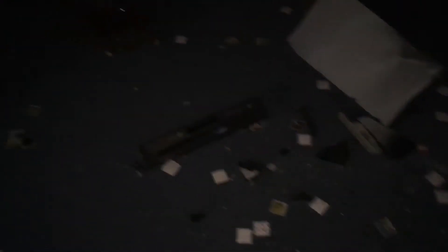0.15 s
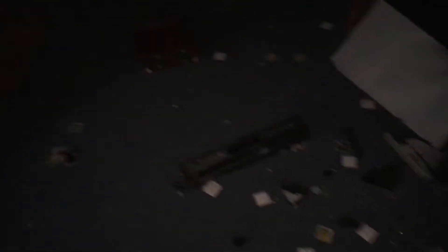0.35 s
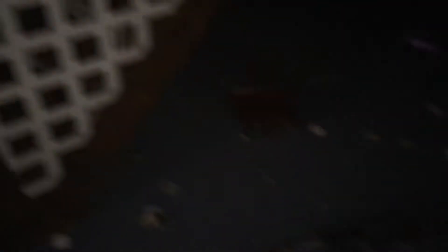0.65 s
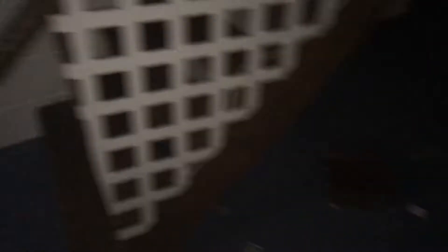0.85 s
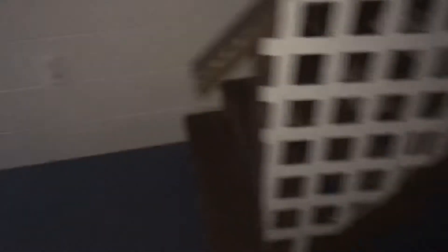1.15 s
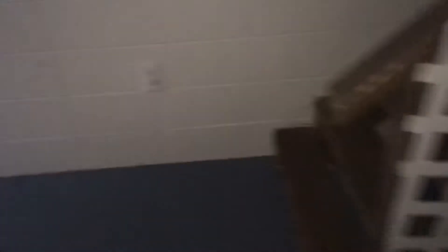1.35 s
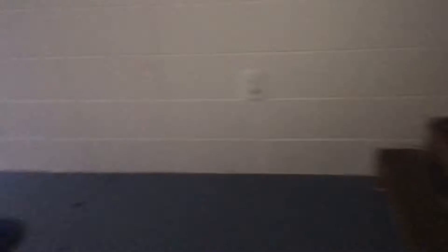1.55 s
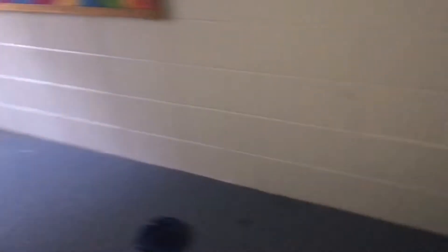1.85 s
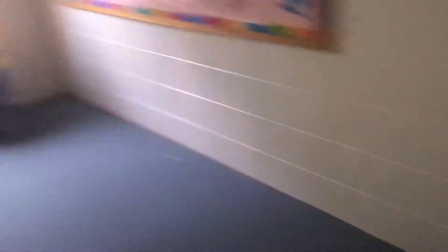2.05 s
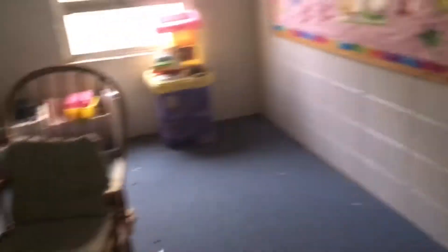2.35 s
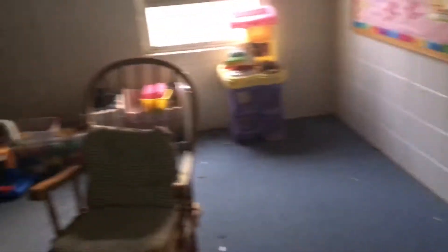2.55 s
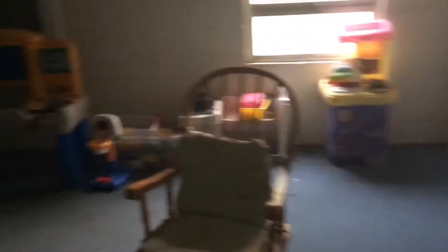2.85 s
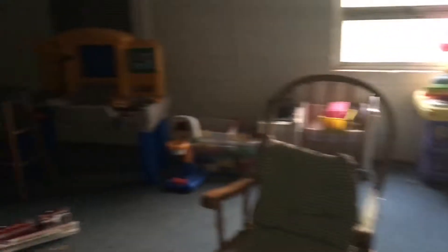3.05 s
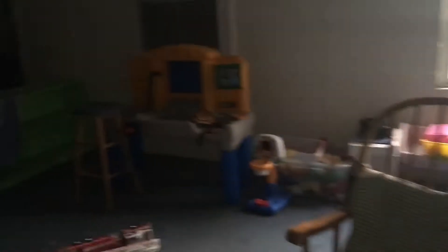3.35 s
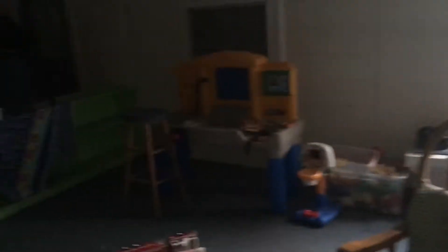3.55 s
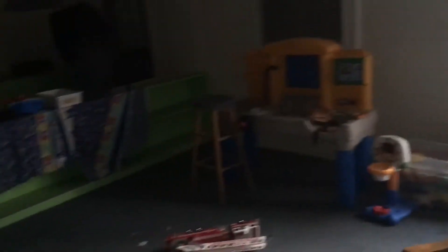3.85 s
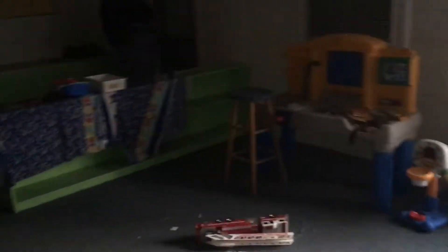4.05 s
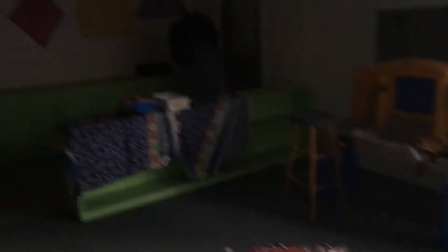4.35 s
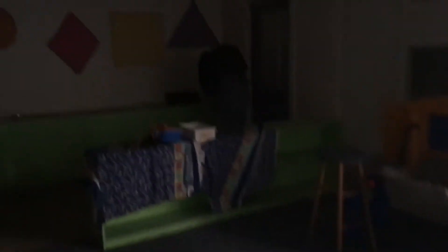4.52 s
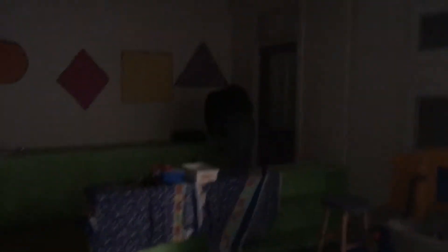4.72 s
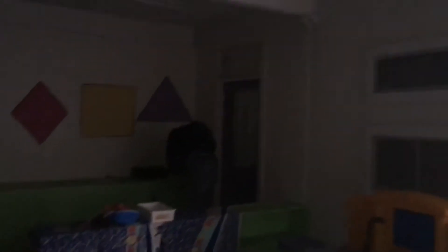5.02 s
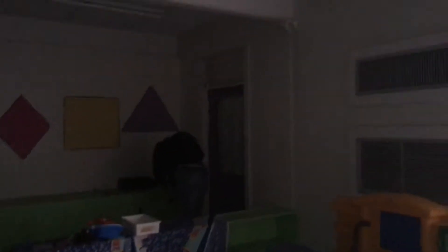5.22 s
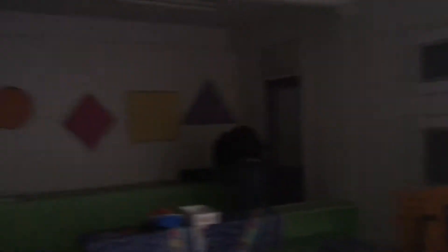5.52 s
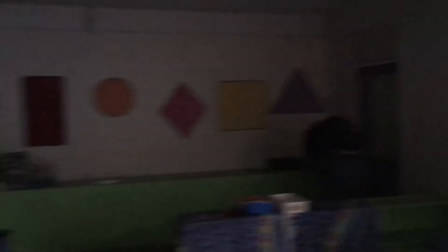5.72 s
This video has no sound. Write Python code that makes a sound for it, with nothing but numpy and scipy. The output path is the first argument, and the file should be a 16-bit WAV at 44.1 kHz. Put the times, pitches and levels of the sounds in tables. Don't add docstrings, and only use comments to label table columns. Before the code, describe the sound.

In a quiet, hard-walled playroom, a handheld camera picks up two quick wooden knocks with a bright buckle tick, then faint scuffs and soft steps on carpet. Midway a hollow plastic toy is kicked and clacks down. After more quiet shuffling, a door scrapes and slams with a rattling latch and deep boom. Low rumble, cloth rustle and hiss lie underneath.

```python
import sys
import numpy as np
from scipy import signal
from scipy.io import wavfile
from scipy.ndimage import uniform_filter1d

SR = 44100
rng = np.random.default_rng(int(sys.argv[2]) if len(sys.argv) > 2 else 0)


def how_loud(loudness_db):
    steps = np.asarray(loudness_db, float) / 20
    return 10 ** steps


def generate_wav(signal):
    frames = np.transpose(np.atleast_2d(signal))
    scaled = np.clip(frames, -1, 1) * 32767
    pcm = np.round(scaled).astype(np.int16)
    wavfile.write(sys.argv[1], SR, pcm)


N = 259308

# spread in octaves, level in the room in dB, quickness of rise.
WOOD = (0.85, -1.8, 5.7)
SNAP, PLASTIC = (0.59, -3, 8.7), (0.69, -4.5, 3.6)
LATCH, SWEEP, JAMB = (0.7, -20, 6.8), (1.97, -5, 1.53), (0.69, -2.5, 6.0)
THUD, SCUFF, SHUFFLE, CLICK = (0.84, -2, 8.7), (2.27, -5, 0.8), (1.22, -6.5, 1.5), (0.51, -4, 6.0)
TICK, PING, FIZZ = (1.5, -13, 3.2), (0.059, -3, 6.0), (0.39, -24, 6.0)
CLICK_MS, PING_MS = 0.95, 8.5

# start in seconds, peak level in dB, centre in Hz, length in ms.
WOOD_KNOCKS = [(.133, -64, 1900, 3.4), (.238, -51.5, 1470, 9), (.252, -42, 1020, 12.3),
               (.27, -42, 894, 7.7), (.281, -53, 980, 5.5), (.302, -51, 791, 7.1), (.436, -58.5, 1200, 3.4),
               (.581, -53, 1120, 11), (.589, -51.5, 865, 3.7), (.602, -41.5, 890, 4.6),
               (.609, -42, 1190, 4.5), (.632, -57, 1020, 3.8), (.684, -59, 1300, 5.5)]
# frequency in Hz, level in dB, t60 in seconds.
BOARD_MODES = [(655, -0.5, 0.51), (780, -3, 0.72), (894, 13.5, 0.12), (1038, 6, 0.29), (1264, -7, 0.61),
               (1370, 0, 0.061)]
# start in seconds, peak level in dB.
BOARD_BLOWS = [
    (0.252, -34),
    (0.27, -25.5),
    (0.303, -39),
    (0.434, -47),
    (0.59, -34),
    (0.61, -29.5),
]
# start in seconds, peak level in dB, centre in Hz, length in ms.
PLASTIC_SNAPS = [(0.245, -53.5, 3920, 3), (.608, -53, 4340, 4.5), (3.243, -63, 5500, 1.2),
                 (3.414, -62, 4600, 1.5), (2.9547, -54, 8400, .8), (2.9755, -54, 10800, .8),
                 (2.978, -50, 10800, 15), (2.9828, -42, 9500, 2), (3.468, -57.5, 4600, 2.3),
                 (3.631, -57, 6940, 6)]
# start in seconds, peak level in dB, centre in Hz, length in ms.
TOY_KNOCKS = [(2.978, -38.5, 3070, 5.2), (2.986, -44.5, 1060, 13), (2.998, -48.5, 3000, 7.1),
              (3.014, -43.5, 3100, 4.2), (3.018, -47.5, 1070, 6.9), (3.632, -58, 700, 8.8),
              (3.635, -54, 2130, 17), (3.669, -56, 1790, 2.4)]
# frequency in Hz, level in dB, t60 in seconds.
TOY_MODES = [(1018, 2, 0.18), (1427, -11, 5.0), (1762, -24, 0.77), (2880, -5, 0.18), (3000, -23, 0.32),
             (3230, -12, 0.14), (3450, -34, 0.27)]
# start in seconds, peak level in dB.
TOY_BLOWS = [
    (2.9777, -31),
    (3.0188, -32),
]
# start in seconds, peak level in dB, centre in Hz, length in ms.
LATCH_RATTLES = [
    (5.3262, -56, 12000, 3),
    (5.3414, -36, 12000, 2.1),
    (5.3556, -40, 14000, 2.5),
    (5.3576, -36, 6200, 2.2),
    (5.3813, -35, 7500, .8),
    (5.383, -30.5, 11500, 1.4),
]
# start in seconds, peak level in dB, centre in Hz, length in ms.
DOOR_SWEEPS = [
    (5.323, -41, 8900, 26),
    (5.3543, -33.5, 2450, 13),
    (5.378, -33.5, 2320, 17.5),
    (5.429, -54, 6500, 11),
]
# start in seconds, peak level in dB, centre in Hz, length in ms.
JAMB_CHATTER = [(5.341, -45, 3660, 16), (5.354, -39.5, 2930, 4), (5.362, -43.5, 850, 23),
                (5.383, -42, 3100, 3.1), (5.403, -38, 2490, 6.1), (5.424, -41, 2200, 6.1),
                (5.438, -43, 2070, 4.2)]
# start in seconds, peak level in dB, frequency in Hz, t60 in seconds.
DOOR_THUMPS = [(5.344, -28, 99.4, 0.25), (5.35, -29.5, 270, 0.35), (5.361, -34, 211.5, .31),
               (5.385, -30.5, 128.5, 0.32), (5.39, -21, 48.1, 0.29), (5.35, -37, 80, .4),
               (5.409, -43, 144, 0.26), (5.43, -47, 425, 0.27), (5.474, -27, 49.6, 0.19),
               (5.47, -43, 165, 0.42), (5.551, -43.5, 75.7, 0.5), (5.72, -53, 49.7, 0.71)]
# start in seconds, peak level in dB, centre in Hz, length in ms.
DULL_BLOWS = [(.255, -46.5, 253, 14), (.30, -49, 160, 33), (.60, -48, 261, 11), (0.627, -55.5, 200, 25),
              (2.9239, -51.5, 345, 2.75), (2.945, -53, 242, 12), (2.98, -50, 313, 18),
              (5.343, -42.5, 280, 5.8), (5.356, -50.5, 480, 38), (5.36, -36.5, 198, 8.6),
              (5.38, -36, 220, 15), (5.401, -37.5, 171, 36), (5.45, -42.5, 154, 24)]
# start in seconds, peak level in dB, frequency in Hz, t60 in seconds.
FLOOR_THUMPS = [(.252, -48, 225, 0.47), (.26, -45.5, 102.4, 0.47), (.338, -39.5, 52.6, .3),
                (.345, -46, 75, 0.22), (.408, -43, 56.3, 0.23), (.59, -46, 226.6, 0.26),
                (.63, -44, 237.6, .23), (1.70, -48.5, 183.6, 0.16), (1.72, -51, 93, 0.31),
                (2.07, -54, 53.7, .27), (2.42, -54, 55, 0.47), (2.725, -46.5, 166.4, .16),
                (2.924, -43, 376, 0.049), (2.94, -49, 169.6, 0.31), (2.98, -47.5, 238, 0.064),
                (3.37, -51, 150, .33), (3.43, -42, 76, 0.14), (3.46, -48.5, 54.7, 0.51),
                (3.55, -51, 52.7, 0.29), (5.1, -55, 72, .3), (5.15, -58, 71.5, 0.28)]
# start in seconds, peak level in dB, centre in Hz, length in ms.
SCUFFS = [(.228, -57.5, 2140, 16), (.405, -61.5, 1597, 17.3), (.79, -58, 6860, 18), (1.095, -63, 2180, 26),
          (1.53, -59.5, 2500, 12), (2.176, -59, 2960, 35), (2.32, -64, 2400, 13), (2.961, -53, 4480, 9.6),
          (3.36, -65, 2500, 29), (3.628, -50, 2370, 10.4), (4.165, -62.5, 2500, 23),
          (4.4496, -58, 3480, 12), (5.08, -68, 1810, 21)]
# start in seconds, peak level in dB, centre in Hz, length in ms.
CARPET_DRAGS = [(.50, -66.5, 3040, 19), (1.28, -69, 1700, 17), (2.03, -66.5, 1390, 25),
                (2.723, -68.5, 1720, 37), (2.977, -49, 2920, 32), (4.079, -70.5, 1470, 60),
                (4.70, -70, 1240, 36)]
# start in seconds, peak level in dB, centre in Hz.
FLOOR_CLICKS = [(1.036, -59, 2250), (1.702, -66, 3500), (2.047, -60, 1300), (2.987, -38.5, 2700),
                (4.3898, -59, 1950), (4.7837, -54, 1310), (5.1962, -64, 1280)]
# start in seconds, peak level in dB, centre in Hz, length in ms.
HOUSING_TICKS = [(.418, -59, 8000, .6), (0.446, -58, 13000, .6), (0.609, -37, 10900, .6),
                 (0.6113, -42, 7950, 0.39), (0.6119, -43, 12100, 1.2), (0.617, -39.5, 13500, 1.2),
                 (0.6827, -54, 4970, .5), (.6876, -65, 12000, .7), (4.373, -66, 7000, .6),
                 (4.784, -60.5, 7000, .6), (5.24, -68, 13000, .6)]
# start in seconds, peak level in dB, centre in Hz.
STRAP_SQUEAKS = [(1.0186, -63, 12100), (2.2707, -68, 12200), (2.4598, -56, 15200), (2.6094, -69, 12100),
                 (2.7776, -67, 15400)]
# start in seconds, peak level in dB, centre in Hz, length in ms.
BUCKLE_FIZZES = [
    (.6085, -33, 14800, 3.8),
    (.6228, -48, 14800, 6.6),
    (5.538, -59, 11500, 2),
]
# frequency in Hz, t60 in seconds.
ROOM_DECAY = [(40, 1), (110, 0.69), (280, 0.32), (740, 0.44), (1940, 0.49), (5120, 0.49), (13500, 0.35)]
# frequency in Hz, density in dB per Hz.
RUMBLE = [(15, -16), (30, -20.5), (40, -4.5), (52, -1), (75, -7), (110, -10), (200, -53)]
MURMUR = [(60, -22), (110, 1.5), (180, -1), (300, -4.5), (420, -8.5), (600, -14.5), (1000, -37.5)]
RUSTLE = [(300, -27), (600, 3.5), (1100, 4), (2000, -0.5), (3500, -2), (4600, -16.5), (7000, -8.5)]
HISS = [(2500, -24), (4500, 0.5), (6200, -2.5), (9000, -3), (13000, -2.5), (15500, -4), (20000, 7.5)]
# time in seconds, stir in dB.
STIR = [(0.0, 0.5), (0.22, 2.5), (0.46, 0.5), (0.6, 3.5), (0.9, -0.5), (1.1, 1.5), (1.45, 5), (1.8, 0.5),
        (2.2, 2), (2.55, -1.5), (3.0, 1), (3.3, 4), (3.7, 0), (4.1, -1.5), (4.7, -3), (5.3, 0.5), (5.65, 3),
        (5.88, -3.5)]
# time of the peak in seconds, level in dB.
SHUDDERS = [
    (0.1, -59),
    (0.42, -59.5),
    (1.95, -73),
    (2.9, -68),
    (3.45, -63),
    (5.45, -51.5),
]
# centre in Hz, width in Hz, gain in dB.
HOUSING_DIPS = [(4860, 680, -6.5), (7780, 1200, -4.5), (10390, 710, -5)]


def contact(db, hz, spread, ms, rise):
    noise = rng.standard_normal(8192)
    samples = np.clip(ms, 0.2, 60) / 1000 * SR
    t = np.arange(len(noise)) / samples
    octaves = np.log2((np.fft.rfftfreq(2048, 1 / SR) + 1) / hz)
    colour = causal(-6.5 * (octaves / max(spread, 0.03)) ** 2)[:1024]
    uneven = noise * abs(noise) ** 0.72
    grit = uneven * (1 - np.exp(-rise * t)) * np.exp(-t)
    grit[0] = 3 * np.sqrt(samples) * np.exp(-(ms / 1.3) ** 2)
    burst = signal.fftconvolve(grit, colour)
    return how_loud(db) * burst / np.sqrt(uniform_filter1d(burst ** 2, size=128).max())


def ring(modes, shorter):
    t = np.arange(SR // 2) / SR
    x = sum(how_loud(db - 60 * t / (shorter * min(t60, 0.5))) * np.sin(2 * np.pi * hz * t) for hz, db, t60 in modes)
    return x / abs(x).max()


def thump(db, hz, t60):
    t = np.arange(SR) / SR
    rise_s = 0.023 * t60 + 0.22 / hz
    push = (1 - np.exp(-t / rise_s)) ** 2
    return how_loud(db - 60 * t / t60) * push * np.sin(2 * np.pi * hz * t)


def contacts(kind, table):
    spread, room_db, rise = kind
    return [(s, contact(db, hz, spread, ms, rise), room_db) for s, db, hz, ms in table]


def blows(table, body):
    return [(s, how_loud(db) * body, -5) for s, db in table]


def thumps(table):
    return [(s, thump(db, hz, t60), -22) for s, db, hz, t60 in table]


def knocked_boards():
    return contacts(WOOD, WOOD_KNOCKS) + blows(BOARD_BLOWS, how_loud(-6) * ring(BOARD_MODES, 0.46))


def knocked_toys():
    hits = contacts(SNAP, PLASTIC_SNAPS) + contacts(PLASTIC, TOY_KNOCKS)
    return hits + blows(TOY_BLOWS, how_loud(-13) * ring(TOY_MODES, 0.39))


def slammed_door():
    metal = contacts(LATCH, LATCH_RATTLES)
    leaf = contacts(SWEEP, DOOR_SWEEPS) + contacts(JAMB, JAMB_CHATTER)
    return metal + leaf + thumps(DOOR_THUMPS)


def footfalls_and_blows():
    weight = contacts(THUD, DULL_BLOWS) + thumps(FLOOR_THUMPS)
    rubbing = contacts(SCUFF, SCUFFS) + contacts(SHUFFLE, CARPET_DRAGS)
    return weight + rubbing + contacts(CLICK, [(*row, CLICK_MS) for row in FLOOR_CLICKS])


def handled_camera():
    squeaks = contacts(PING, [(*row, PING_MS) for row in STRAP_SQUEAKS])
    return contacts(TICK, HOUSING_TICKS) + squeaks + contacts(FIZZ, BUCKLE_FIZZES)


def room(sends):
    taps = np.zeros((len(sends), SR))
    jitter = rng.integers(0, 12, (len(sends), (SR - 129) // 12))
    at = np.arange(120, SR - 20, 12) + jitter
    np.put_along_axis(taps, at, rng.choice([-1.0, 1.0], at.shape), 1)
    hz, t, z = signal.stft(taps, SR, nperseg=256)
    decay = how_loud(-60 * t / read(ROOM_DECAY, hz)[:, None])
    tails = signal.istft(z * decay, SR, nperseg=256)[1]
    return signal.fftconvolve(sends, tails / np.linalg.norm(tails[0]), axes=1)[:, :N].sum(0)


def bed(spectrum, level_db, patchy_db, flicker_db, size=1024):
    frames, hz = 4 * N // size + 5, np.fft.rfftfreq(size, 1 / SR)
    a, b, patches = rng.standard_normal((frames, len(hz), 3)).T
    flicker = evened(uniform_filter1d(patches[0], size=5))
    patches = uniform_filter1d(patches, size=12, axis=0)
    patches = evened(uniform_filter1d(patches, size=12, axis=1))
    colour_db = read(spectrum, hz)[:, None] + patchy_db * patches + flicker_db * flicker
    z = (a + 1j * b) * how_loud(colour_db)
    noise = signal.istft(z, nperseg=size, noverlap=3 * size // 4)[1][:N]
    return how_loud(level_db) * evened(noise)


def shudders(t):
    rise_s, fall_db_per_s = 0.069, 32.5
    return sum(np.clip(1 + (t - s) / rise_s, 0, 1) * how_loud(db - fall_db_per_s * np.maximum(t - s, 0))
               for s, db in SHUDDERS)


def background():
    t = np.arange(N) / SR
    stir = np.interp(t, *np.transpose(STIR))
    rumble_db = 20 * np.log10(how_loud(-69.5 + 0.4 * stir) + shudders(t))
    rumble = bed(RUMBLE, rumble_db, 1.6, 1.3, size=4096)
    murmur = bed(MURMUR, -69 + 1.19 * stir, 2.25, 1.5, size=2048)
    rustle = bed(RUSTLE, -71 + 1.08 * stir, 1.75, 0.27)
    hiss = bed(HISS, -65 + 0.51 * stir, 0.33, 0.89)
    return rumble + murmur + rustle + hiss


def evened(x):
    return x / np.sqrt(np.mean(x ** 2) + 1e-20)


def read(points, hz):
    f, value = np.transpose(points)
    return np.interp(np.log(hz + 1), np.log(f + 1), value)


def causal(db):
    log_gain = np.log(how_loud(np.maximum(db, -100)))
    circle = np.concatenate([log_gain, log_gain[-2:0:-1]])
    return np.fft.ifft(np.exp(np.conj(signal.hilbert(circle)))).real


def add(mix, s, sound):
    part = mix[round(s * SR):][:len(sound)]
    part += sound[:len(part)]


def scene():
    direct, sends = background(), np.zeros((4, N))
    for source in (knocked_boards, knocked_toys, slammed_door, footfalls_and_blows, handled_camera):
        for k, (s, sound, room_db) in enumerate(source()):
            add(direct, s, sound)
            add(sends[k % 4], s, how_loud(room_db) * sound)
    return (direct + room(sends))[None]


def band_limit(x):
    return signal.sosfilt(signal.butter(12, 16680, fs=SR, output="sos"), x)


def record(dry):
    low_cut_hz, top_hz = 27.5, 15830
    hz = np.fft.rfftfreq(2048, 1 / SR)
    dips_db = sum(db * np.exp(-((hz - f) / width) ** 2) for f, width, db in HOUSING_DIPS)
    x = signal.oaconvolve(dry, causal(dips_db)[:1024][None])[:, :N]
    x = signal.lfilter(*signal.butter(2, low_cut_hz, "high", fs=SR), x)
    top_cut = signal.firwin(1023, top_hz, window=("kaiser", 9), fs=SR)
    x = signal.oaconvolve(x, top_cut[None], "same")
    return band_limit(x)


dry = scene()
out = record(dry)
generate_wav(out)
```